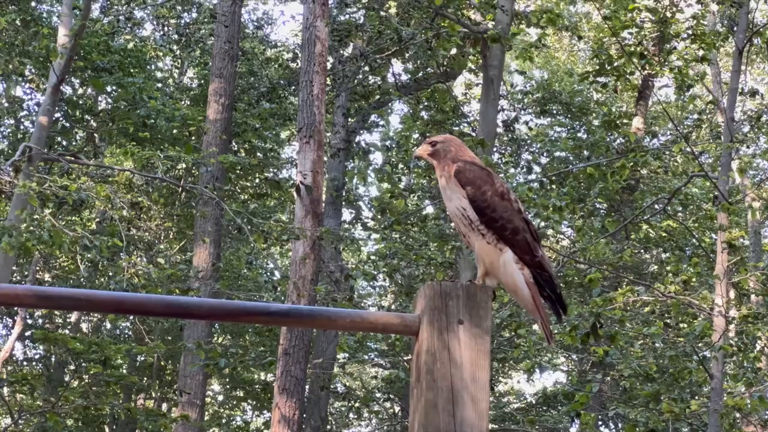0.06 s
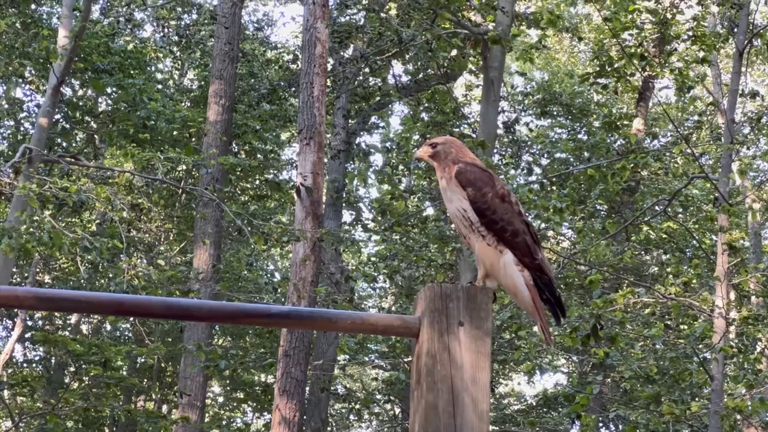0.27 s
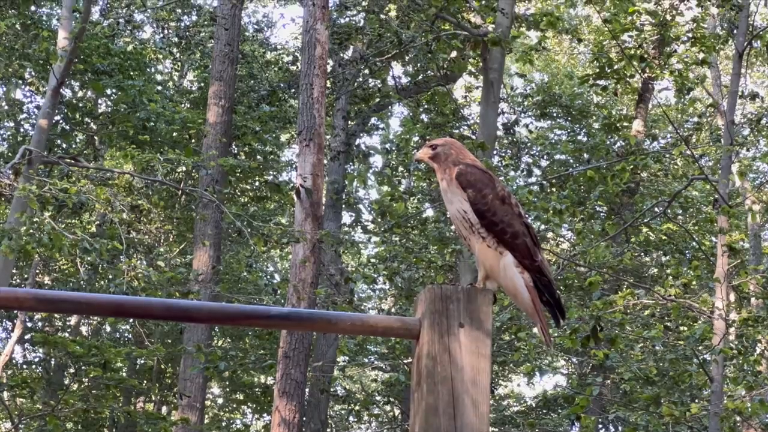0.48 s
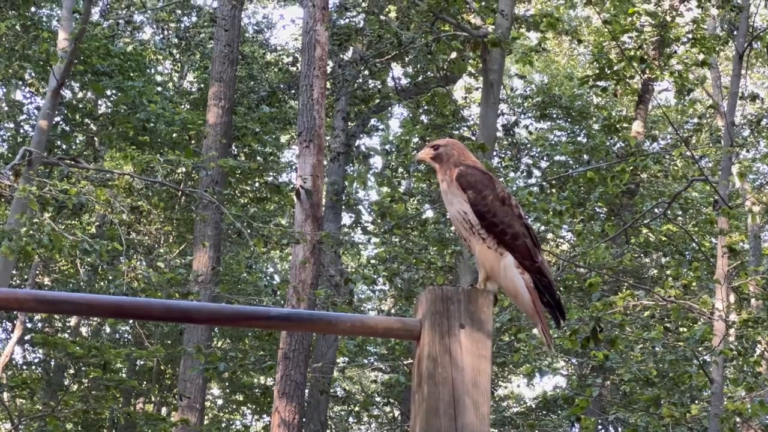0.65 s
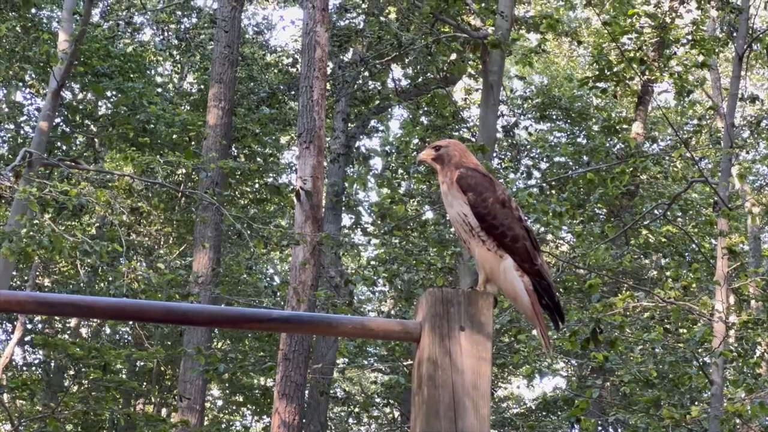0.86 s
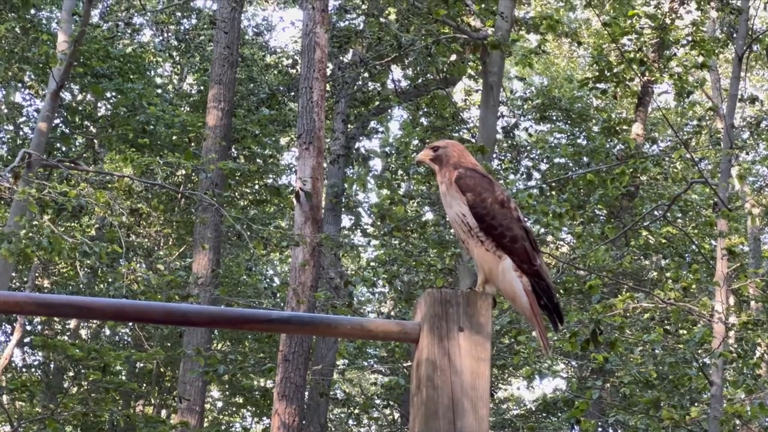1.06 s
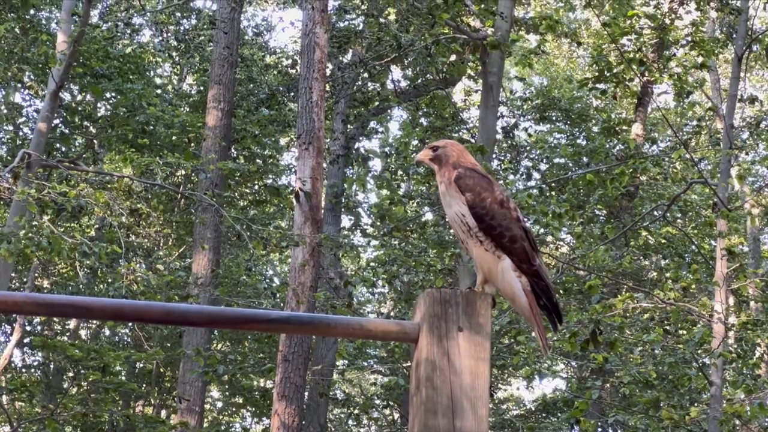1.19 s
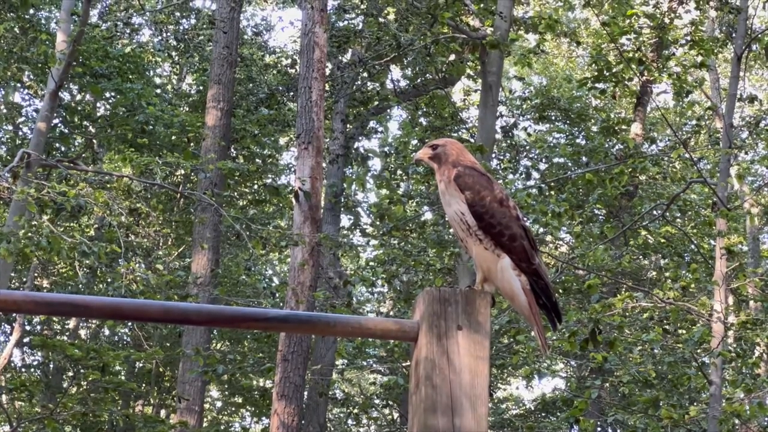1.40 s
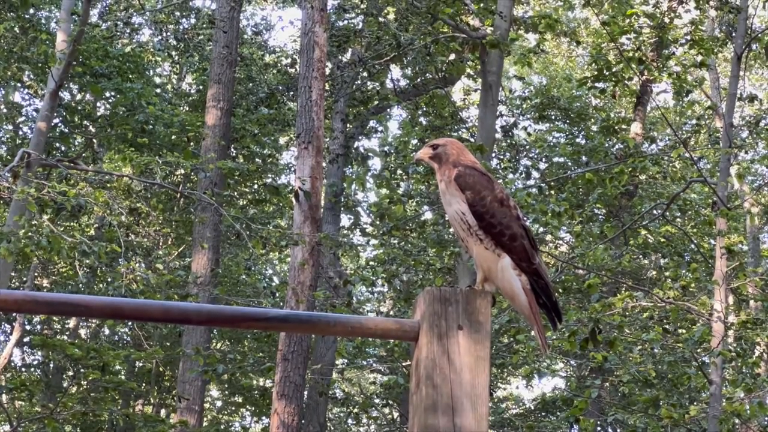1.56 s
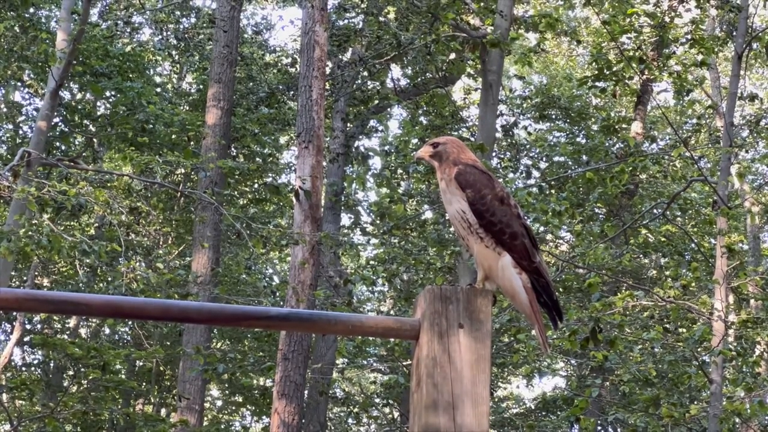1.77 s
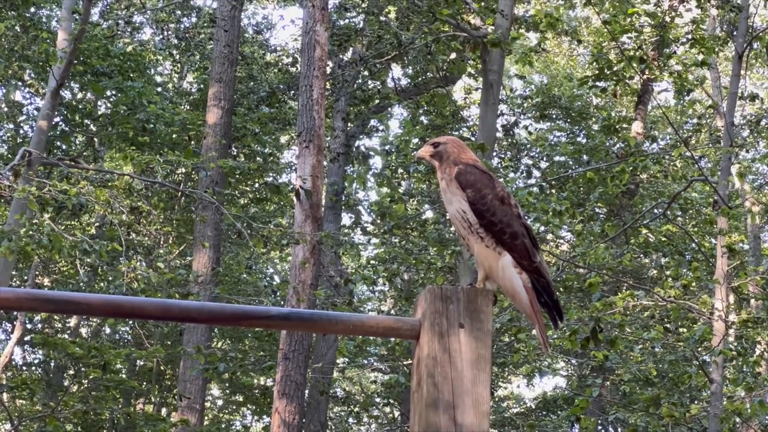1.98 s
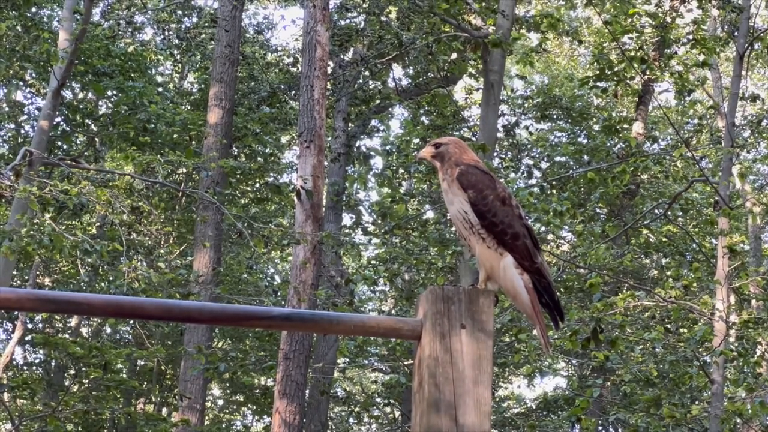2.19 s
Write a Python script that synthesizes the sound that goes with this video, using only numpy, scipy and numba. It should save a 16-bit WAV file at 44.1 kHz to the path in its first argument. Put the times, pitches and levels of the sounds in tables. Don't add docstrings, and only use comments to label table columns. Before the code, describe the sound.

A hawk a few metres away squawks harshly twice, about a second and a half apart, each call cracking into a fluttering scream. Woodland echoes trail behind; faint traffic rumble continues, picked up by a phone.

```python
import sys
import numpy as np
from scipy import signal
from scipy.fft import rfft, irfft
from scipy.io import wavfile
from scipy.ndimage import uniform_filter1d
from numba import njit

SR = 44100
rng = np.random.default_rng(int(sys.argv[2]) if len(sys.argv) > 2 else 0)


def file_out(sig):
    cols = np.atleast_2d(sig).T
    lim = np.clip(cols, -1, 1)
    pcm = np.round(lim * 32767).astype(np.int16)
    wavfile.write(sys.argv[1], SR, pcm)


def volts_from_decibels(level):
    exponent = np.asarray(level, float) / 20
    return 10 ** exponent


N = 99225


def level(x, db):
    return x * volts_from_decibels(db) / np.sqrt(np.mean(x ** 2))


def curve(rows, t, column=1):
    rows = np.array(rows, float)
    return np.interp(t, rows[:, 0], rows[:, column])


def colour(rows):
    rows = np.array(rows, float)
    bins_hz = np.fft.rfftfreq(N, 1 / SR)
    return np.interp(np.log(bins_hz + 1), np.log(rows[:, 0] + 1), rows[:, 1])


@njit
def svf(x, hz, width_hz):
    y, band, low = np.empty(len(x)), 0., 0.
    for i in range(len(x)):
        g, k = np.tan(np.pi * hz[i] / SR), width_hz / hz[i]
        v = (band + g * (x[i] - low)) / (1 + g * (g + k))
        band, low, y[i] = 2 * v - band, low + 2 * g * v, k * v
    return y


def resonate(x, hz, width_hz):
    return svf(x, hz + np.zeros(len(x)), 1. * width_hz)


def ring(x, hz, width_hz):
    return resonate(resonate(x, hz, width_hz), hz, width_hz)


def walk(rate_hz, size=N):
    hold = int(SR / rate_hz)
    x = np.repeat(rng.standard_normal(size // hold + 1), hold)
    x = uniform_filter1d(uniform_filter1d(x, hold), hold)[:size]
    return x / x.std()


def flatten(x):
    return x / np.sqrt(uniform_filter1d(x ** 2, int(.02 * SR)) + 1e-9)


def background():
    # (frequency [Hz], level [dB per Hz])
    road = [(82, -40), (140, -6), (247, -3), (318, -8), (372, -11), (485, -12), (712, -18.5), (1000, -22.5),
            (3300, -32.5), (4290, -69.5), (7260, -120)]
    # (frequency [Hz], level [dB per Hz])
    rumble = [(12, -55), (20, -23), (27, -34), (47, -3), (65, 1.5), (118, -4.5), (146, -19), (176, -8),
              (200, -21.5), (260, -34.5), (440, -120)]
    # (frequency [Hz], level [dB per Hz])
    leaves = [(1940, -24.5), (3300, -7.5), (3520, -1.5), (3680, -0.5), (6220, -2.5), (7560, -3.5),
              (10600, -16.5), (11900, -12), (15500, -24)]
    # (frequency [Hz], side minus mid [dB])
    spread = [(60, -20.5), (110, -19.5), (200, -5.5), (380, -9), (700, -1), (1290, -3), (2380, -16.5),
              (4400, -12.5), (8120, -16.5), (15000, 7.5)]
    # (time [s], level [dB])
    traffic = [
        (0.0, -60.5),
        (0.61, -60.5),
        (0.86, -59),
        (1.21, -63),
        (1.38, -61.5),
        (1.82, -62),
        (2.25, -63),
    ]
    side_gain = volts_from_decibels(colour(spread))
    swell_db = curve(traffic, np.arange(N) / SR)
    swell_db = swell_db - swell_db.mean()
    out = 0
    # spectrum, rms dB, share of the swell followed, flicker dB
    layers = ((road, -62.5, .8, .6), (rumble, -51.5, .6, 1.5), (leaves, -88.5, .1, .3))
    for shape, db, follow, flicker_db in layers:
        gain = volts_from_decibels(colour(shape))
        mid = irfft(rfft(rng.standard_normal(N)) * gain, N)
        side = irfft(rfft(rng.standard_normal(N)) * gain * side_gain, N)
        stereo = level(np.array([mid + side, mid - side]), db)
        out = out + stereo * volts_from_decibels(follow * swell_db + flicker_db * walk(4))
    return out


def engine_drone():
    # (time [s], level [dB])
    fade = [
        (0, -80),
        (.1, -72),
        (.25, -71.5),
        (.4, -95.5),
        (2.25, -120),
    ]
    drone = level(ring(rng.standard_normal(N), 420, 61), 0)
    return drone * volts_from_decibels(curve(fade, np.arange(N) / SR))


def twigs():
    # (time [s], level [dB], centre frequency [Hz])
    ticks = [
        (2.13, -69, 2200),
    ]
    t, out = np.arange(N) / SR, 0
    for at_s, db, hz in ticks:
        burst = rng.standard_normal(N) * (t > at_s) * np.exp(-np.clip(t - at_s, 0, None) / 0.0061)
        out = out + volts_from_decibels(db) * resonate(burst, hz, 0.75 * hz) * 2
    return out


def tone(rows):
    t = np.arange(N) / SR
    inside = (t > rows[0][0]) & (t < rows[-1][0])
    hz = curve(rows, t) * (1 + 0.012 * walk(90))
    wave = np.sin(2 * np.pi * np.cumsum(hz) / SR)
    return inside * wave * np.sqrt(2) * volts_from_decibels(curve(rows, t, column=2) + 2.5 * walk(43.8))


def far_bird():
    # (time [s], pitch [Hz], level [dB])
    peep = [
        (.73, 1355, -100),
        (.76, 1355, -78),
        (.80, 1350, -87),
        (.85, 1345, -100),
    ]
    return tone(peep)


def wood(x):
    # (frequency [Hz], t60 [s], level [dB])
    scatter = [(734, 1, -36.5), (1507, 0.36, -27.5), (3032, 0.77, -25), (3900, 0.5, -26), (4700, 0.4, -28),
               (5800, 0.39, -14), (8150, 0.079, -16), (11850, 0.33, -26.5)]
    long_t60_s, long_db, onset_s, side = 1.66, -14.5, 0.005, 0.14
    t, out = np.arange(N) / SR, []
    for _ in range(2):
        echo = 0
        for hz, t60_s, db in scatter:
            tail_t60_s = long_t60_s * t60_s / scatter[2][1]
            fade = volts_from_decibels(-60 * t / t60_s) + volts_from_decibels(long_db - 60 * t / tail_t60_s)
            band = ring(rng.standard_normal(N), hz, .5 * hz) * fade * (1 - np.exp(-t / onset_s))
            echo = echo + volts_from_decibels(db) * band / np.sqrt(np.sum(band ** 2))
        out.append(signal.fftconvolve(x, echo)[:N])
    return np.array([out[0] + side * out[1], out[0] - side * out[1]])


def phone_ports(x):
    # (frequency [Hz], side minus mid [dB])
    ports = [(300, -12), (750, -8), (1500, -18), (3100, -9), (5000, -14), (8000, -8), (10000, 0),
             (13000, -9)]
    side = irfft(rfft(x) * -1j * volts_from_decibels(colour(ports)), N)
    return np.array([x + side, x - side])


def phone_body(stereo):
    # (frequency [Hz], width [Hz])
    notches = [(10600, 960), (14000, 3700)]
    for hz, width_hz in notches:
        for _ in range(2):
            stereo = np.array([c - resonate(c, hz, width_hz) for c in stereo])
    return stereo


def intake_whistle():
    # (time [s], pitch [Hz], level [dB])
    whistle = [
        (1.40, 950, -100),
        (1.47, 1035, -79),
        (1.572, 1075, -82),
        (1.59, 1095, -69),
        (1.625, 1120, -71),
        (1.64, 1130, -80),
        (1.66, 1150, -73),
        (1.70, 1200, -72),
        (1.712, 1210, -100),
    ]
    # (time [s], pitch [Hz], level [dB])
    overtone = [
        (1.62, 1760, -95),
        (1.655, 1790, -81),
        (1.70, 1830, -79),
    ]
    return tone(whistle) + tone(overtone)


def membranes(since_s, phase, beat, jitter, half, flutter, combined):
    # (harmonic [-], flutter beats added [-], level [dB])
    combination = [(2, -1, -3), (3, 1, 4), (4, 1, -6), (7, 2, 0), (8, -2, 0)]
    size, orders = len(phase), np.arange(1, 23)[:, None]
    patchy_db = np.array([walk(45, size) for _ in orders]) * 3 * np.clip(orders / 6, 0, 1)
    odd = 1 - (orders % 2) * np.exp(-(since_s / 0.0076) ** 2)
    pulses = (np.cos(orders * phase) * volts_from_decibels(patchy_db) * odd).sum(axis=0)
    pulses = pulses * (1 + half * np.cos(phase / 2))
    pulses = pulses * (2.5 + .45 * flutter * np.sin(beat + .9))
    pulses = pulses + combined * sum(volts_from_decibels(db) * np.cos(k * phase + m * beat) for k, m, db in combination)
    return pulses * volts_from_decibels(2.5 * (3.5 + 13 * jitter) * walk(500, size) * 0.12)


def throat_rasp(since_s, pulses, air, beat, jitter, onset_s, rasp_db):
    split = pulses * sum(np.cos(m * beat + m * m) for m in range(2, 4)) + (.15 + 30 * jitter) * air
    rasp = ring(split, 3600, 2000) + ring(split, 5800, 1800) + .6 * ring(split, 2350, 600)
    rough = volts_from_decibels(rasp_db) * np.clip((since_s - onset_s) / .03, .12, 1)
    crack = volts_from_decibels(-12) * np.exp(-(since_s / .03) ** 4)
    return flatten(rasp) * (rough + crack)


def postures(x, t, rows):
    times_s, out = [r[0] for r in rows], 0
    for blend, (_, throat_hz, throat_db, beak_hz, beak_db) in zip(np.eye(len(rows)), rows):
        throat = volts_from_decibels(throat_db) * ring(x, throat_hz, 400)
        beak = volts_from_decibels(beak_db) * ring(x, beak_hz, 800)
        out = out + np.interp(t, times_s, blend) * (throat + beak)
    return out


def windpipe(x):
    # (frequency [Hz], width [Hz], level [dB])
    pipe = [(3200, 600, -12), (3900, 600, -14), (4750, 600, -19), (5800, 900, -19), (7800, 2000, -27),
            (9500, 1200, -33), (11500, 1100, -27), (12600, 1100, -28)]
    return sum((-1) ** k * volts_from_decibels(db) * ring(x, hz, width) for k, (hz, width, db) in enumerate(pipe))


def valleys(x):
    # (frequency [Hz], width [Hz], share removed [-])
    dark = [(1900, 330, .9), (4400, 400, .4), (2680, 200, .5)]
    for hz, width_hz, removed in dark:
        x = x - removed * resonate(x, hz, width_hz)
    return x


def squawk(pitch, effort, mouth, manner, voice_break, sheen):
    # (time from call start [s], jitter [-], half-pitch [-], flutter [-])
    state = [
        (0, .06, .3, 0),
        (.014, .02, .3, 0),
        (.032, .018, .4, 0),
        (.045, .002, .02, 0),
        (.115, .002, .01, .05),
        (.135, .003, .02, .9),
        (.175, .003, .02, 1),
        (.205, .003, .02, .5),
        (.26, .02, .1, .6),
    ]
    start_s, end_s = effort[0][0], effort[-1][0]
    first = int(start_s * SR)
    t = np.arange(first, int(end_s * SR)) / SR
    since_s, size = t - start_s, len(t)
    share, rasp_onset_s, rasp_db, early, breath_db = manner
    jitter, half, late = (curve(state, since_s, column=c) for c in range(1, 4))
    flutter = np.maximum(late, early * np.clip((since_s - .04) / .03, 0, 1))
    flutter = flutter * share * volts_from_decibels(1.5 * walk(40, size))

    smooth_hz = curve(pitch, t)
    beat = 2 * np.pi * np.cumsum(132 * (1 + .02 * walk(40, size))) / SR
    hz = smooth_hz * (1 + jitter * walk(900, size) + .034 * flutter * np.sin(beat))
    phase = 2 * np.pi * np.cumsum(hz) / SR
    pulses = membranes(since_s, phase, beat, jitter, half, flutter, share * late)
    air = rng.standard_normal(size) * (1 + np.cos(phase)) * 3
    rasp = throat_rasp(since_s, pulses, air, beat, jitter, rasp_onset_s, rasp_db)
    breath = volts_from_decibels(-25 + breath_db) * (1 + 70 * jitter + 1.5 * flutter) * air
    x = pulses + breath - .7 * ring(breath, 1000, 1800)

    y = postures(x, t, mouth) + windpipe(x)
    y = y + volts_from_decibels(-23.5) * (1 - half) * ring(x, smooth_hz, 250)
    y = y - volts_from_decibels(-15 - 2.5 * late) * ring(x, 2 * smooth_hz - 60, 416)
    y = y - volts_from_decibels(-21 + 8.5 * since_s / 0.29) * ring(x, 3 * smooth_hz + 50, 450)
    glint = np.clip(np.minimum(t - sheen[0], sheen[1] - t) / .01, 0, 1)
    y = y + volts_from_decibels(-33 + sheen[2]) * glint * ring(x, 15300, 900)
    y = valleys(flatten(y) + rasp)

    break_s, dip_db, recovery_s = voice_break
    after_s = t - break_s
    dip = dip_db * np.clip(after_s / .002, 0, 1) * np.exp(-(after_s / recovery_s) ** 2)
    edge = np.clip(np.minimum(since_s, end_s - t) / .006, 0, 1)
    out = np.zeros(N)
    out[first:first + size] = y * volts_from_decibels(curve(effort, t) + dip) * edge
    return out


def hawk_calls():
    # (time [s], pitch [Hz])
    pitch = [
        [(0.219, 650), (0.229, 759), (0.233, 822), (0.243, 802), (0.271, 828), (0.291, 799), (0.438, 753),
         (0.452, 715), (0.474, 724)],
        [(1.699, 573), (1.709, 739), (1.715, 798), (1.721, 786), (1.747, 824.6), (1.779, 786.8), (1.926, 748),
         (1.94, 722), (1.962, 727)],
    ]
    # (time [s], level [dB])
    effort = [
        [(0.218, -37), (0.228, -44), (0.252, -35.5), (0.262, -42.5), (0.305, -34.5), (0.35, -37.5), (0.43, -34),
         (0.466, -40.5), (0.476, -50)],
        [(1.698, -41.5), (1.714, -47), (1.73, -37), (1.752, -48.5), (1.762, -40.5), (1.8, -45), (1.898, -36),
         (1.95, -40), (1.964, -57)],
    ]
    # (time [s], throat [Hz], throat level [dB], beak [Hz], beak level [dB])
    mouth = [
        [(.22, 3665, -15, 7320, -2.5), (.24, 3890, 4.5, 6760, -9), (.26, 3750, -15, 4950, -1.5),
         (.283, 4020, -1, 5030, 2.5), (.292, 3308, -2, 6150, -4.5), (.34, 3130, 1.5, 6320, -30),
         (.36, 3003, 0, 5400, -9), (.435, 2944, 3, 5800, -7), (.455, 2840, -1.5, 3585, -11)],
        [(1.70, 3570, -28, 7180, -10), (1.73, 3770, 2.5, 6400, -14.5), (1.745, 4000, -7, 4650, -13),
         (1.765, 3770, -6, 4700, -3.5), (1.782, 3620, -32, 7050, -28), (1.825, 3600, -2.5, 6180, -11),
         (1.84, 2900, -8, 5900, -40), (1.91, 2964, 6.5, 5850, -16), (1.95, 2940, 4.5, 3640, -15)],
    ]
    # (flutter share [-], rasp onset [s], rasp level [dB], early flutter [-], breath level [dB])
    manner = [
        (1.0, .115, -19, .08, -1),
        (.9, .06, -14, .45, 1),
    ]
    # (time [s], dip [dB], recovery [s])
    breaks = [
        (0.442, -5, 0.0078),
        (1.933, -11, 0.0067),
    ]
    # (start [s], end [s], level [dB])
    sheen = [
        (.22, .385, 2),
        (1.775, 1.83, 0),
    ]
    return sum(squawk(*call) for call in zip(pitch, effort, mouth, manner, breaks, sheen))


def scene():
    hawk = hawk_calls() + intake_whistle()
    near = phone_ports(hawk) + wood(hawk) + far_bird() + twigs()
    mix = phone_body(near) + background() + engine_drone()
    t = np.arange(N) / SR
    return mix * np.clip(np.minimum(t, t[::-1]) / .012, .15, 1)


def roll_off(x):
    return signal.sosfilt(signal.butter(12, 15930, fs=SR, output="sos"), x)


def record(dry):
    return roll_off(dry)


dry = scene()
out = record(dry)
file_out(out)
```